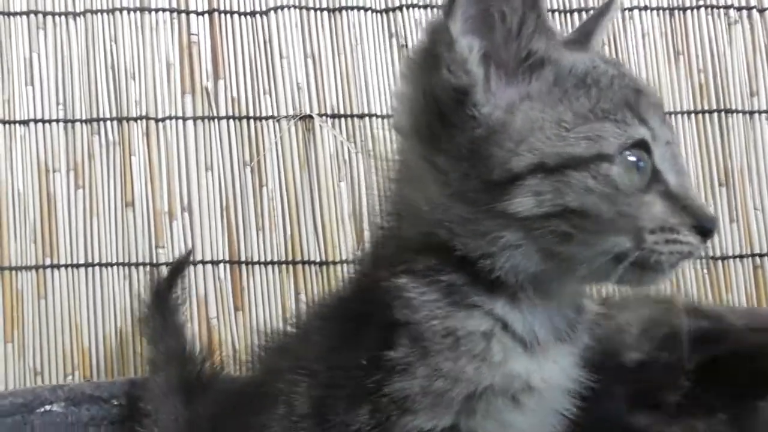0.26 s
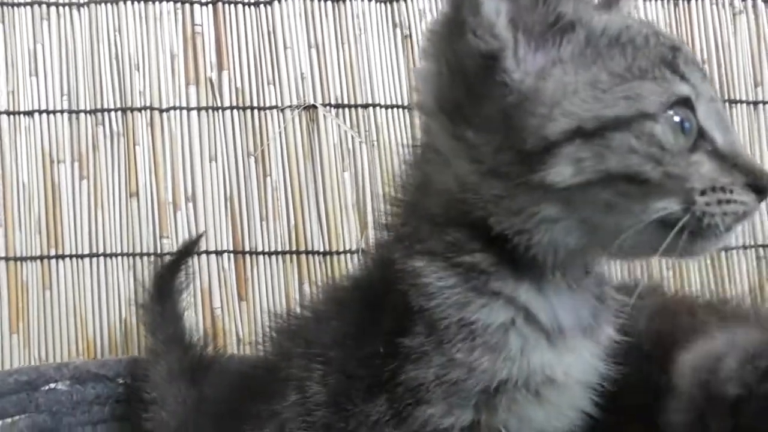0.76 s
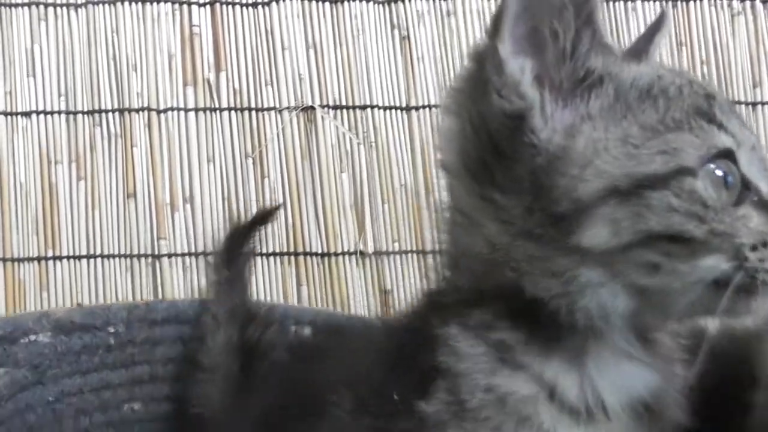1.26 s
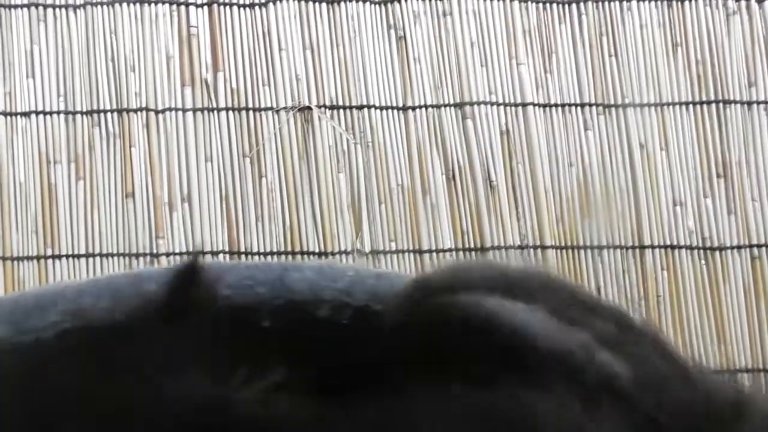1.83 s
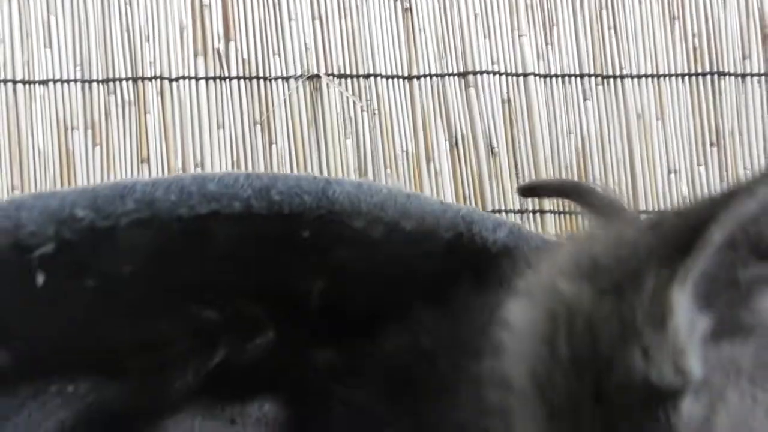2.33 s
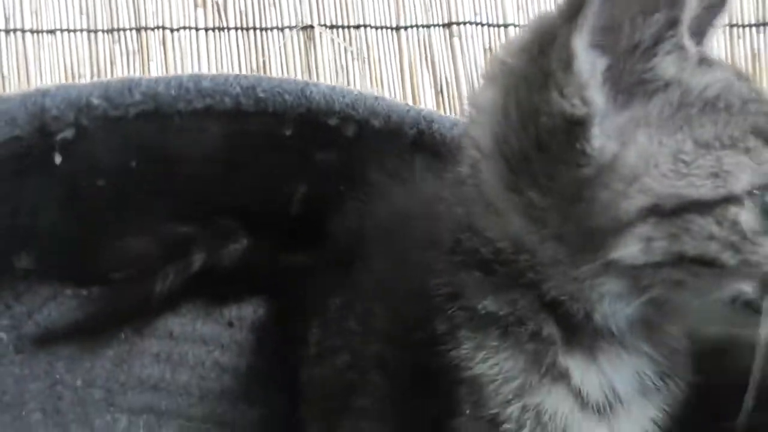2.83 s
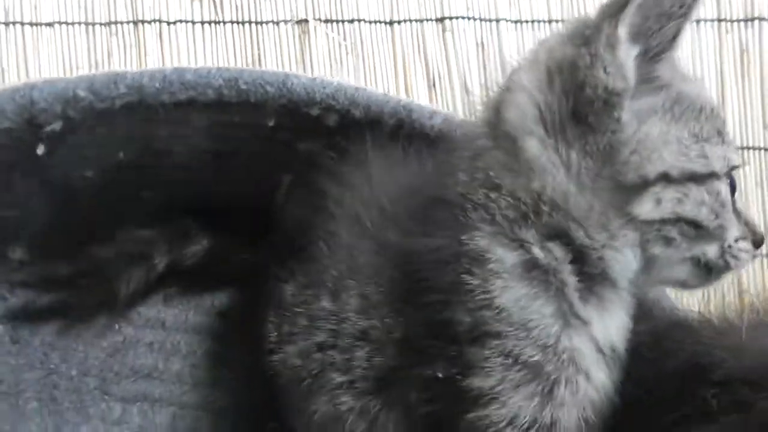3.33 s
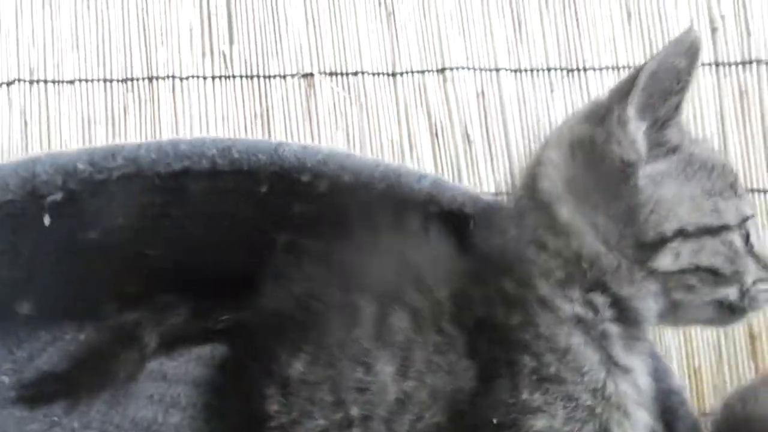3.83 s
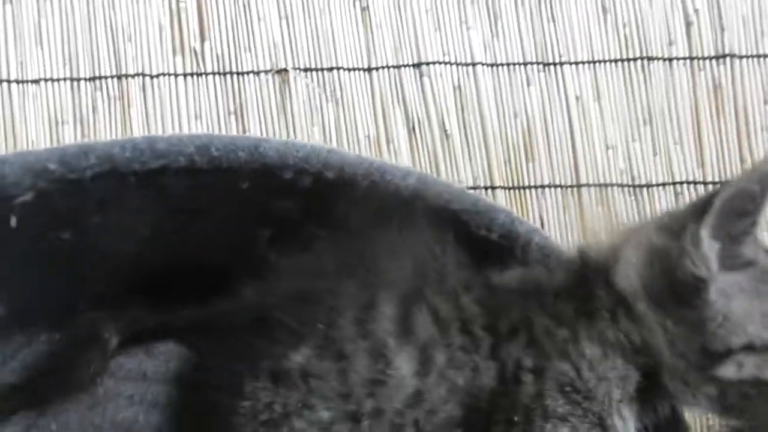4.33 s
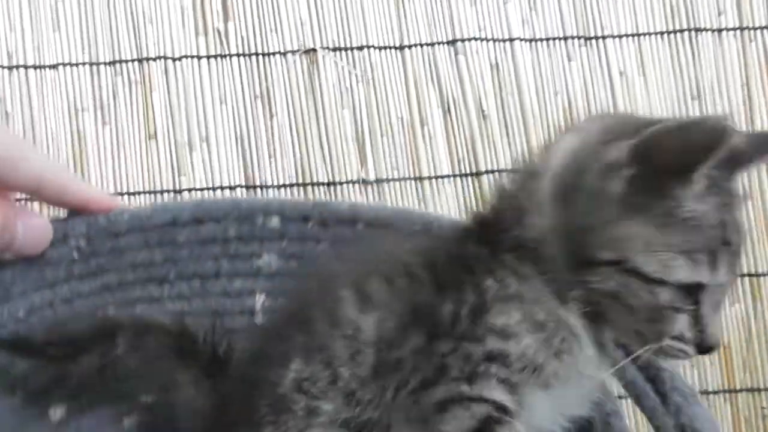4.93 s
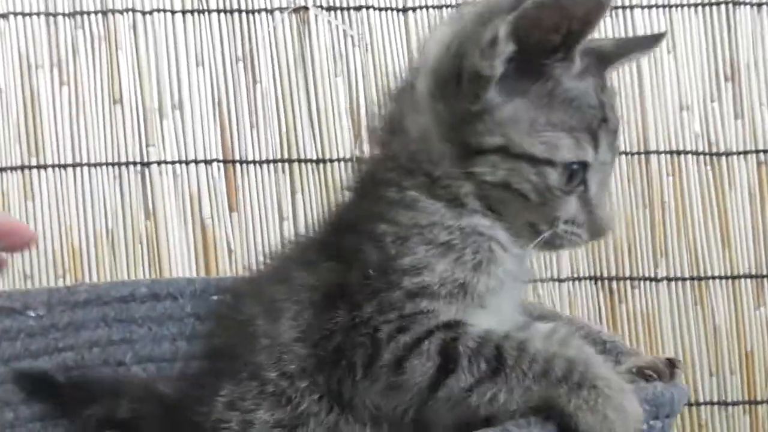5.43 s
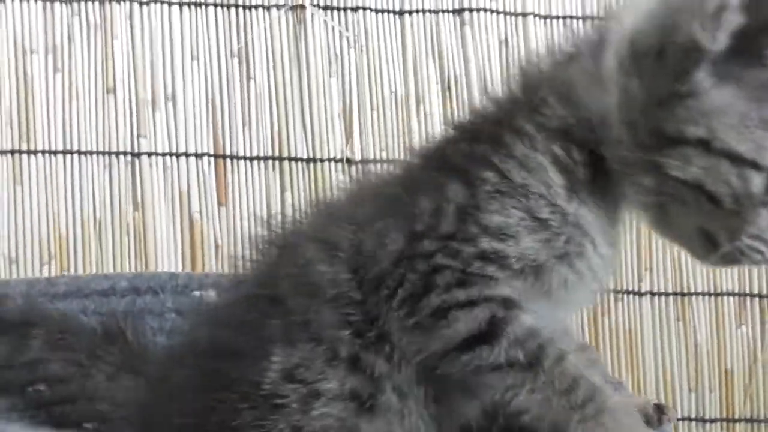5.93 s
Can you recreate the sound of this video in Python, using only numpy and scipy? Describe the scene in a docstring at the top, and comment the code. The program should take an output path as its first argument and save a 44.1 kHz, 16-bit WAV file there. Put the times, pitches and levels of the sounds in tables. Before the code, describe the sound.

Close, quiet rustling and paw taps in a rope basket, interrupted by fingers sliding on the camera and a single hard knock.

```python
"""A quiet room, a small camera's microphone close to a woven rope basket where kittens scuffle.
Paws tap the basket, bodies press the weave until it groans, fur brushes, fibres crackle and
claws tick. For a while a hand handles the camera: fingers slide on its shell, with wide-sounding
bumps, clicks and one hard knock. Under it all lie room tone and the faint ticking
of the camera's focus motor."""
import sys
import numpy as np
from scipy import signal
from scipy.io import wavfile
from scipy.ndimage import uniform_filter1d

SR = 44100
rng = np.random.default_rng(int(sys.argv[2]) if len(sys.argv) > 2 else 0)


def store_pcm(level_fs):
    """Save levels as 16-bit WAV."""
    pcm = np.round(np.clip(level_fs, -1, 1) * 32767).astype(np.int16)
    wavfile.write(sys.argv[1], SR, np.atleast_2d(pcm).T)


N = 271775

# soft thuds, paws on the basket and handling bumps on the camera:
# (time [s], peak [dB], centre [Hz], loss one octave off the centre [dB])
THUDS = [(0.158, -48, 161, 9), (1.0887, -44, 678, 8), (1.1586, -44, 188, 11), (1.2401, -47, 360, 0),
         (1.3084, -43, 630, 5), (1.4047, -44.5, 540, 8), (1.449, -39, 580, 11), (1.528, -25.5, 420, 14),
         (1.54, -38, 95, 10), (1.5553, -36, 376, 15), (1.5692, -40, 436, 11), (1.6024, -37.5, 580, 9),
         (1.6689, -42, 462, 17), (1.6829, -35, 435, 6), (1.6962, -38.5, 120, 1), (1.7795, -41, 156, 13),
         (1.92, -45.5, 425, 10), (2.6782, -35, 812, 19), (3.1373, -40, 780, 2), (3.1714, -40, 845, 2.5),
         (3.2304, -34.5, 494, 4.5), (3.24, -31, 413, 4), (3.366, -46, 1200, 13), (3.4013, -38.5, 1120, 8.5),
         (3.428, -46, 300, 7), (3.5102, -36.5, 318, 6), (3.5451, -29.5, 450, 3.5), (3.888, -30.5, 453, 1),
         (3.9043, -19, 660, 12), (3.9173, -20, 494, 10), (3.926, -21.5, 791, 9.5), (3.939, -29, 269, 9),
         (3.96, -39, 296, 5), (3.9847, -32, 317, 15), (4.0228, -44, 446, 4), (4.474, -45.5, 90, 14),
         (4.4745, -38.5, 426, 28), (4.6592, -45.5, 425, 11), (4.8274, -41, 559, 6), (5.0015, -47, 486, 13),
         (5.0285, -44, 800, 10), (5.2609, -43, 520, 15), (5.5945, -44, 457, 23), (5.6498, -48.5, 445, 14),
         (5.7692, -46, 670, 12), (5.8846, -44.5, 540, 37), (5.8985, -49, 530, 46), (5.91, -52, 530, 46),
         (6.0264, -36, 239, 8), (6.0402, -42, 390, 3), (6.0584, -44, 96, 7)]
# the modes that the thuds ring: (frequency [Hz], level [dB], t60 [s])
THUD_MODES = [(93.2, -3.5, 0.12), (169.3, 0., 0.082), (250, -1.5, 0.071), (326.6, -2, 0.095),
              (432, 0., 0.061), (525, -0.5, 0.058), (636, -2, 0.056), (802, 1., 0.056), (1083, -2.5, 0.049),
              (1450, -4.5, 0.043)]
# the knock: (time [s], pulse [dB], length [ms], rebound [dB], length [ms], thump [dB], pitch [Hz], t60 [s])
SHELL_KNOCK = (3.9126, -1.5, 0.95, -18, 1.9, -31, 93.5, 0.17)
# claw taps, fibre snaps, camera handling clicks and two focus motor steps: (time [s], main port peak [dB],
# top port offset [dB], middle port offset [dB], low port offset [dB], energy decay time [ms])
TICKS = [(0.19, -52.5, -5, -32, -28, 0.2), (1.052, -45.5, -5, -19, -28, 0.16),
         (1.159, -46, -13, -11, -9, 0.27), (1.1791, -44.5, -19, -12, -29, 0.2),
         (1.3021, -42, -14, -16, -8, 0.27), (1.4486, -46, -9, -6, -7, 0.24),
         (1.5281, -30, -7, -21, -17, 0.59), (1.603, -54, -17, -7, -10, 0.22),
         (1.6125, -33, -8, -36, -31, 0.29), (1.6787, -30, -13, -6.5, -14, 0.61),
         (1.6963, -48, -19, 0, -18, 0.2), (1.708, -45, -10, -4, -13, 0.39),
         (1.7156, -42, 5.5, -12, -20, 0.22), (1.751, -49, -22, -15, -29, 0.3),
         (1.7743, -48, -14, 0, -26, 0.2), (1.7792, -28.5, -14, -17.5, -40, 0.21),
         (1.832, -48, -15, -21, -32, 0.2), (1.8485, -50, -21, -4, -24, 0.6),
         (2.0157, -47.5, -4, -16, -11, 0.4), (2.0721, -45.5, -16, -36, -30, 0.26),
         (2.1612, -47, -14, -14, -34, 0.28), (2.3918, -53, -15, -29, -29, 0.36),
         (2.4561, -48, 0, -27, -36, 0.2), (2.6783, -33.5, -3, -1.5, -4.5, 0.75),
         (2.7407, -48, -19, -29, -29, 0.8), (2.7534, -45.5, -14, -26, -27, 0.3),
         (2.765, -42.5, -10, -22, -24, 0.18), (2.874, -45.5, -20, -20, -25, 0.19),
         (3.1369, -31, -2, -3, -15.5, 0.55), (3.1645, -29, -11, -5.5, -17, 1.5),
         (3.1704, -27.5, -17, -8, -18, 0.73), (3.365, -50, 4, 12.5, 9.5, 0.97),
         (3.3708, -41, -2, 2, -5, 0.93), (3.4022, -44.5, -11, 9, 7, 0.42),
         (3.4959, -36.5, -13, -8.5, -14, 0.73), (3.548, -31.5, -10, -6, -7, 0.55),
         (3.5669, -37.5, -10, -30, -33, 0.27), (3.8831, -24.5, -24, -2, -15, 0.57),
         (3.8898, -27, -5, -3, -7, 0.56), (3.901, -42, 4, 14.5, 5, 0.81),
         (3.9038, -23.5, -17, -13, -11, 1.4), (3.9093, -15, -9, -4, -14, 2), (3.9123, -14, 0, -1, -1, 0.31),
         (3.9224, -29, -6, -1, 1, 1.1), (3.9356, -41, -17, 2, 1, 1.1), (3.9407, -42, -13, -10, -4, 0.72),
         (3.961, -57, -15, 0, 13, 0.95), (3.9664, -17.5, -21, -7, -16, 0.25), (3.987, -46, -10, 4, 1, 0.49),
         (3.9938, -42.5, -14, 1.5, 5.5, 0.45), (4.1659, -61, -16, 2, 7.5, 1.7),
         (4.2292, -63, -19.5, 0, 9, 2.8), (4.3781, -49.5, -19, 0.5, -7, 0.56),
         (4.526, -42.5, -13, -20, -31, 0.44), (4.532, -37.5, -15, -33, -35, 0.18),
         (4.5705, -38.5, -1, -37, -37, 0.27), (4.6109, -41, -4, -32, -30, 0.2),
         (4.6318, -39, -2, -18, -35, 0.34), (4.6618, -43, -6, -18, -27, 0.2),
         (4.8146, -38, -2, -24, -28, 0.17), (4.8277, -30.5, -5, -23, -33, 0.25),
         (4.967, -46.5, 5, -28, -23, 0.23), (4.9972, -45, 4, -18, -22, 0.18),
         (5.0493, -40, -13, -26, -28, 0.31), (5.1008, -38, -3, -32, -33, 0.3),
         (5.1272, -44, -8, -24, -19, 0.36), (5.153, -38, -13, -29, -26, 0.37),
         (5.1915, -42, 1, -15, -15, 0.5), (5.2116, -38, -17, -35, -29, 0.3),
         (5.2478, -47, -8, -20, -16, 0.3), (5.379, -49.5, -18, -34, -30, 0.3),
         (5.4688, -50, -10, -9, -30, 0.3), (5.769, -50, -3, -16, -19, 0.3),
         (5.799, -43, -19, -14, -30, 0.34), (6.0182, -41, -23, -27, -28, 0.2),
         (6.033, -40, -8, -25, -13, 0.2), (6.0655, -38.5, -16, -22, -28, 0.54),
         (6.0735, -41, 0, -31, -30, 0.3)]
# microphone ports, main, top, middle and low: (centre [Hz], width [Hz], left-right likeness [-1..1])
MIC_PORTS = [(7880, 2470, 1), (10800, 4600, .2), (3790, 1200, 0.98), (2015, 950, 0.84)]
# movement in the basket: (time [s], shuffle level [dB], crackle level [dB])
MOVEMENT = [(0, -71, -80), (0.6, -71.5, -78), (1.0, -66, -72), (1.2, -55.5, -64.5), (1.45, -53.5, -63.5),
            (1.55, -49.5, -58), (1.75, -56, -61.5), (2.0, -63, -70), (2.3, -76, -78), (2.65, -65, -70.5),
            (3.05, -66.5, -76), (3.2, -59, -65), (3.55, -57, -72), (3.86, -63, -78), (3.93, -37, -73),
            (4.02, -53, -67), (4.09, -71.5, -73), (4.42, -67, -77), (4.53, -58, -59.5),
            (4.68, -53.5, -64.5), (4.78, -56.5, -65), (4.92, -59, -68), (5.1, -53.5, -56.5),
            (5.22, -57.5, -60.5), (5.35, -63, -73), (5.7, -64.5, -73.5), (6.0, -62.5, -66),
            (6.05, -51.5, -56.5), (6.12, -60.5, -66)]
# fingers sliding on the camera body, a swelling hiss: (fastest moment [s], swell [s], fade [s], level [dB])
FINGER_SLIDES = [(2.6, 0.13, 0.063, -71.5), (3.09, 0.057, 0.066, -66), (3.19, 0.1, 0.16, -54),
                 (3.36, .22, 0.14, -51), (3.54, 0.081, 0.11, -60), (3.62, 0.09, 0.26, -56.5),
                 (4.25, 0.13, 0.1, -77)]
# spectra of bodies, fur and fingers, fibres and room tone: (frequency [Hz], relative density [dB])
SHUFFLE_SPECTRUM = [(35, -35), (60, -1), (112, -2), (136, -6), (205, -3), (279, -3.5), (430, -0.5),
                    (760, -5), (1090, -11), (1640, -23), (3000, -27), (3900, -49.5), (6600, -120)]
BRUSH_SPECTRUM = [(710, -40.5), (1200, -10), (1350, -11), (1500, -20), (1920, -8.5), (3020, -15.5),
                  (4070, -2), (5210, -14), (5550, -8), (6590, -7), (7420, -1), (8440, -3.5), (10800, -9),
                  (12500, -16), (15500, -18)]
FIBRE_SPECTRUM = [(1470, -40), (2500, -8), (2830, -16.5), (3420, -6), (3990, -11.5), (4970, -20),
                  (7020, -1.5), (7930, -0.5), (10900, -4.5), (15500, -19.5)]
AIR_SPECTRUM = [(12, -47), (20, -18), (40, -10.5), (59, 4), (83, -15), (106, -5), (238, -10.5),
                (315, -19.5), (416, -14), (858, -18), (1460, -32.5), (2090, -29), (2540, -38.5),
                (3860, -33.5), (4960, -42), (15500, -29.5)]
# the weave's groan: (time [s], level [dB], pitch [Hz])
WEAVE_GROAN = [(3.6, -77, 280), (3.66, -61, 281.6), (3.72, -57, 285), (3.79, -62, 278), (3.85, -73, 273)]
# the focus motor, louder while it hunts: (time [s], level [dB])
MOTOR_LEVELS = [(0, -88.5), (2.1, -84), (2.72, -79.5), (2.79, -72), (3.1, -82), (3.2, -82), (4.1, -80),
                (4.2, -76), (4.35, -82.5), (6.16, -80.5)]
# narrow peaks and microphone resonances colouring the room hiss: (centre [Hz], width [Hz], lift [dB])
HISS_RESONANCES = [(55.7, 19, 1.5), (112, 13, 2.5), (163.4, 12, 3), (1830, 71, 6), (2034, 76, 9.5),
                   (2750, 100, 9.5), (3266, 75, 8), (3870, 250, 7), (7840, 1900, 5)]
# stereo image from in front, via the shell, of room tone: (frequency [Hz], left-right likeness [-1..1])
FRONT_IMAGE = [(60, 0.64), (180, 0.84), (550, 0.95), (1650, 1), (4970, 1), (15000, 0.72)]
SHELL_IMAGE = [(60, 0.31), (180, -0.15), (550, 0.16), (1650, 0.79), (4970, 1), (15000, 0.52)]
AIR_IMAGE = [(60, 0.93), (130, 0.47), (290, -0.09), (640, -0.41), (1410, 0.95), (3100, 1), (6820, 1),
             (15000, 0.054)]
# the room's decay: (frequency [Hz], t60 [s])
ROOM_DECAY = [(100, 0.15), (500, 0.16), (2000, 0.17), (8000, 0.092)]

TOUCH_FROM_S, TOUCH_TO_S = 2.66, 4.06  # a hand on the camera
PAW_RING_SHARE, SHELL_RING_SHARE = 0.57, 0.43  # of the free decay time
TICK_PAN_DB, SHELL_TICK_PAN_DB = -1.3, 1  # left over right
FUR_UNDER_DB = -15  # against the bodies' shuffle
STEP_ALIGN_S, STEPS_PER_S = 2.7833, 59.94  # focus motor
STEP_DECAY_MS, STEP_SPREAD_DB, STEP_LOW_PORT_DB = 4.1, 3.5, -5.5
AIR_DB, BAND_LIMIT_HZ = -61, 15750


def soft_thuds():
    """A paw on the basket or a hand on the camera rings damped modes near the thud's centre."""
    out, t = np.zeros((2, N)), np.arange(3500) / SR
    for s, db, centre, focus_db in THUDS:
        on_shell = touching(s)
        ring_share = SHELL_RING_SHARE if on_shell else PAW_RING_SHARE
        # modes start nearly in step in the shared part, at random in the part that gives width
        phases = (rng.random((2, len(THUD_MODES))) - .5) * [[.35], [1]]
        parts = np.zeros((2, len(t)))
        for (hz, mode_db, t60), phase in zip(THUD_MODES, phases.T):
            loss_db = focus_db * np.log2(hz / centre) ** 2 + 60 * t / (t60 * ring_share)
            parts += gain_of(mode_db - loss_db) * np.sin(2 * np.pi * (hz * t + phase[:, None]))
        attack = 1 - np.exp(-t / 0.0014)
        thud = stereo(*parts, likeness=-.25 if on_shell else .96) * attack
        place(out, s, at_peak(thud, db), pan_db=-2.2 if on_shell else .8)
    return out


def shell_knock():
    """One hard blow on the camera, dead centre: a suction pulse, its rebound and a low dying thump."""
    s, pulse_db, pulse_ms, rebound_db, rebound_ms, thump_db, hz, t60 = SHELL_KNOCK
    out, t = np.zeros((2, N)), np.arange(8000) / SR
    place(out, s, -gain_of(pulse_db) * half_sine(pulse_ms))
    place(out, s + pulse_ms / 1000, gain_of(rebound_db) * half_sine(rebound_ms))
    place(out, s, -gain_of(thump_db - 60 * t / t60) * np.sin(2 * np.pi * hz * t))
    return out


def sharp_ticks():
    """A short burst of cracks rings the microphone ports; duller snaps favour the lower ones."""
    out, t = np.zeros((2, N)), np.arange(800) / SR
    attack = 1 - np.exp(-t / .00015)
    for s, db, *offsets_db, ms in TICKS:
        burst = rng.standard_normal((2, len(t))) * np.exp(-500 * t / ms) * attack
        pan_db = SHELL_TICK_PAN_DB if touching(s) else TICK_PAN_DB
        for (hz, width, likeness), offset_db in zip(MIC_PORTS, [0] + offsets_db):
            tick = stereo(*port_ring(burst, hz, width), likeness)
            place(out, s, at_peak(tick, db + offset_db), pan_db)
    return out


def body_shuffle():
    """Bodies press the weave in uneven lumps."""
    rub = patchy_noise(lambda hz: at_hz(SHUFFLE_SPECTRUM, hz), patchy_db=2.4)
    pressure = unit_rms(2.0 + contacts(per_s=140, spread_db=1.8, decay_ms=6.2))
    return fader(MOVEMENT) * rub * pressure


def fur_and_fingers():
    """Fur hisses smoothly as the bodies move; fingers sliding on the camera add swells of hiss."""
    t = np.arange(N) / SR
    power = (gain_of(FUR_UNDER_DB) * fader(MOVEMENT)) ** 2
    for s, swell, fade, db in FINGER_SLIDES:
        speed = np.sin(np.interp(t, [s - swell, s, s + fade], [0, np.pi / 2, 0]))
        power += gain_of(db) ** 2 * speed ** 3.5
    return np.sqrt(power) * patchy_noise(lambda hz: at_hz(BRUSH_SPECTRUM, hz), patchy_db=2.2, size=512)


def fibre_crackle():
    """Rope fibres let go in tiny clicks."""
    hiss = patchy_noise(lambda hz: at_hz(FIBRE_SPECTRUM, hz), patchy_db=2.1, size=256)
    slips = unit_rms(1.15 + contacts(per_s=240, spread_db=3.6, decay_ms=0.58))
    return fader(MOVEMENT, column=2) * hiss * slips


def weave_groan():
    """The weave groans under load: one faint, wavering tone."""
    s, db, hz = np.transpose(WEAVE_GROAN)
    out, t = np.zeros((2, N)), np.arange(s[0], s[-1], 1 / SR)
    waver = 1 + 0.034 * unit_rms(uniform_filter1d(rng.standard_normal(len(t)), size=500))
    phase = 2 * np.pi * np.cumsum(np.interp(t, s, hz) * waver) / SR
    place(out, s[0], gain_of(np.interp(t, s, db)) * np.sin(phase))
    return out


def focus_motor():
    """Each motor step is a short rattle in the middle and low ports, alike on both sides."""
    t = np.arange(N) / SR
    steps = (t - STEP_ALIGN_S) * STEPS_PER_S + 400  # the offset keeps the count positive
    strength = gain_of(STEP_SPREAD_DB * rng.standard_normal(800))[steps.astype(int)]
    decay = np.exp(-1000 * (steps % 1) / (STEPS_PER_S * STEP_DECAY_MS))
    rattle = strength * decay * rng.standard_normal(N)
    middle, low = (unit_rms(port_ring(rattle, hz, width)) for hz, width, _ in MIC_PORTS[2:])
    return fader(MOTOR_LEVELS) * (middle + gain_of(STEP_LOW_PORT_DB) * low)


def room_reflections(x):
    """Sparse echoes of random sign, different on each side; each band dies at its own speed."""
    echoes = np.zeros((2, SR // 2))
    slots = np.arange(160, SR // 2 - 20, 20)
    arrivals = slots + rng.integers(0, 20, (2, len(slots)))
    np.put_along_axis(echoes, arrivals, rng.choice([-1., 1.], arrivals.shape), 1)
    hz, t, spectra = signal.stft(echoes, SR, nperseg=256)
    decay = gain_of(-60 * t / at_hz(ROOM_DECAY, hz)[:, None])
    tail = signal.istft(spectra * decay, SR, nperseg=256)[1]
    return signal.fftconvolve(x, tail / np.linalg.norm(tail[0]), axes=1)[:, :N]


def room_tone():
    """Low rumble and hiss, coloured by narrow peaks and microphone resonances."""
    def spectrum_db(hz):
        peaks = sum(db * np.exp(-(2 * (hz - centre) / width) ** 2) for centre, width, db in HISS_RESONANCES)
        return at_hz(AIR_SPECTRUM, hz) + peaks
    air = patchy_noise(spectrum_db, patchy_db=0.99, size=2048, image=AIR_IMAGE, touch_image=AIR_IMAGE)
    return gain_of(AIR_DB) * air


def patchy_noise(spectrum_db, patchy_db, size=1024, image=FRONT_IMAGE, touch_image=SHELL_IMAGE):
    """Stereo noise with drifting spectral patches, rms 1; takes touch_image during handling."""
    frames, hz = 4 * N // size + 5, np.fft.rfftfreq(size, 1 / SR)
    a, b, c, d, patches = rng.standard_normal((frames, len(hz), 5)).T
    patches = uniform_filter1d(patches, size=8, axis=0)  # across frequency
    patches = unit_rms(uniform_filter1d(patches, size=6, axis=1))  # across time
    on_shell = touching(np.arange(frames) * size / (4 * SR))
    likeness = np.where(on_shell, at_hz(touch_image, hz)[:, None], at_hz(image, hz)[:, None])
    colour = gain_of(spectrum_db(hz)[:, None] + patchy_db * patches)
    spectra = stereo(a + 1j * b, c + 1j * d, likeness) * colour
    return unit_rms(signal.istft(spectra, nperseg=size, noverlap=3 * size // 4)[1][:, :N])


def contacts(per_s, spread_db, decay_ms):
    """Envelope of scattered, dying contacts of uneven strength, rms 1."""
    strength = gain_of(spread_db * np.minimum(rng.exponential(1, N), 4))
    hits = strength * (rng.random(N) < per_s / SR)
    return unit_rms(signal.lfilter([1], [1, -np.exp(-1000 / (decay_ms * SR))], hits))


def port_ring(x, hz, width):
    """A microphone port: two passes through a two-pole resonance of gain 1."""
    b, a = signal.iirpeak(hz, hz / width, SR)
    return signal.lfilter(b, a, signal.lfilter(b, a, x))


def touching(s):
    """True while the hand is on the camera's shell."""
    return (s > TOUCH_FROM_S) & (s < TOUCH_TO_S)


def half_sine(ms):
    """One smooth push lasting ms."""
    t = np.arange(400) / SR
    return np.sin(np.pi * np.minimum(1000 * t / ms, 1))


def stereo(a, b, likeness):
    """Two channels of a given likeness from two unrelated signals."""
    return np.array([a, likeness * a + np.sqrt(1 - likeness ** 2) * b])


def place(mix, s, sound, pan_db=0):
    """Adds a sound at time s; a positive pan leans left."""
    part = mix[:, round(s * SR):][:, :sound.shape[-1]]
    part += gain_of([[pan_db / 2], [-pan_db / 2]]) * sound[..., :part.shape[1]]


def fader(table, column=1):
    """Gain at every sample from a table of times and levels."""
    columns = np.transpose(table)
    return gain_of(np.interp(np.arange(N) / SR, columns[0], columns[column]))


def at_hz(table, hz):
    """Reads a table on a log-frequency axis."""
    frequencies, values = np.transpose(table)
    return np.interp(np.log(hz + 1), np.log(frequencies + 1), values)


def at_peak(sound, db):
    """Scales a stereo sound so that its mid signal peaks at db."""
    return gain_of(db) * sound / abs(sound.mean(axis=0)).max()


def unit_rms(x):
    """Scales to rms 1."""
    return x / np.sqrt(np.mean(x ** 2) + 1e-20)


def gain_of(db):
    """Decibels to gain."""
    return 10 ** (np.asarray(db) / 20)


def scene():
    """Basket and handling up close, with a little of the room behind the sharp sounds."""
    ticks, thuds, knock = sharp_ticks(), soft_thuds(), shell_knock()
    room = room_reflections(gain_of(-22.0) * ticks + gain_of(-19.5) * thuds + gain_of(-28.0) * knock)
    rustle = body_shuffle() + fur_and_fingers() + fibre_crackle()
    return thuds + knock + ticks + rustle + weave_groan() + room + room_tone() + focus_motor()


def record(dry):
    """The camera clips at full scale, then cuts the highest treble."""
    lowpass = signal.firwin(511, BAND_LIMIT_HZ, window=("kaiser", 9), fs=SR)
    return signal.oaconvolve(np.clip(dry, -1, 1), lowpass[None], "same")


dry = scene()
out = record(dry)
store_pcm(out)
```